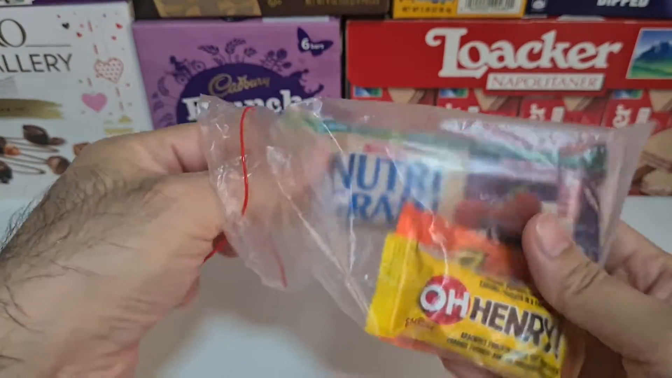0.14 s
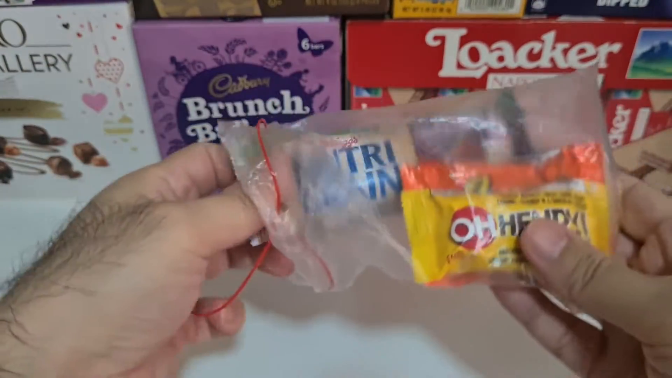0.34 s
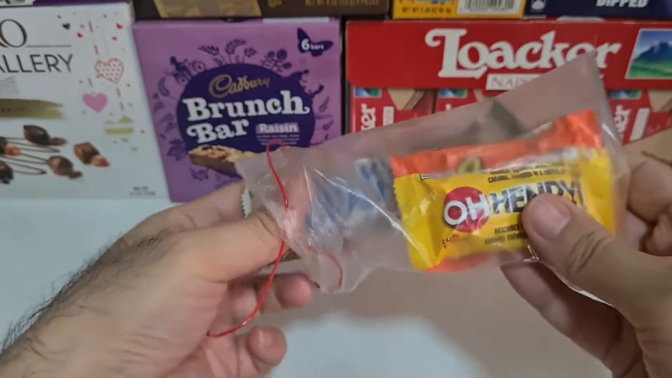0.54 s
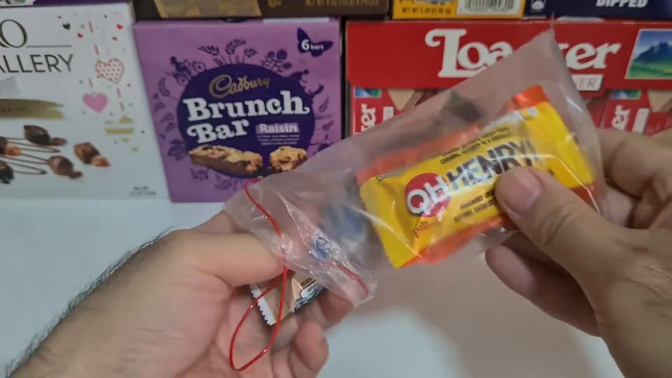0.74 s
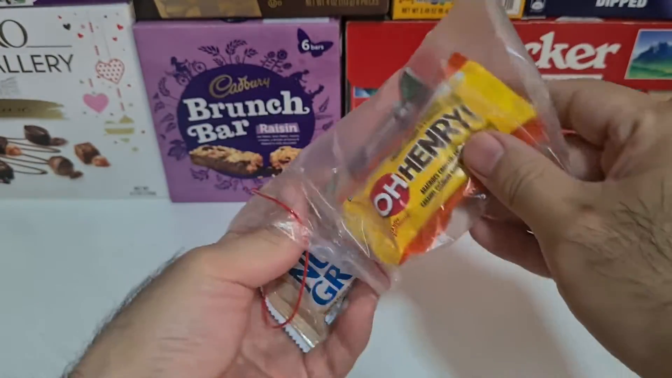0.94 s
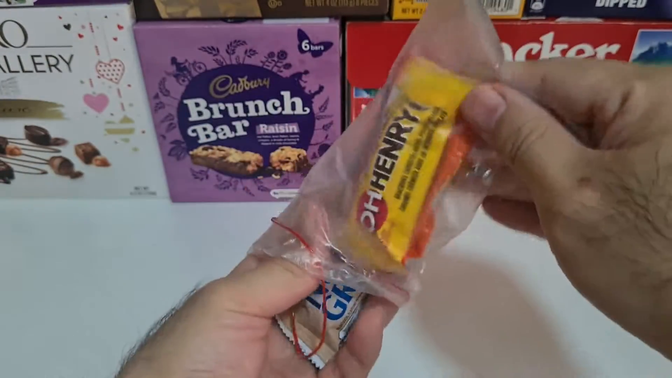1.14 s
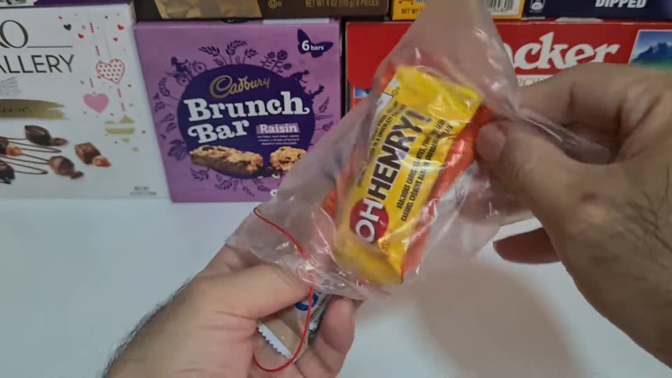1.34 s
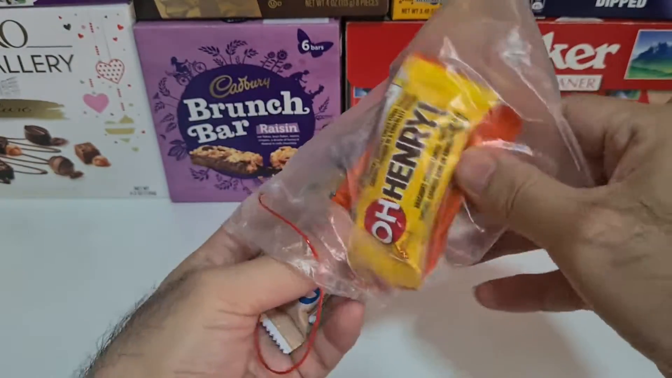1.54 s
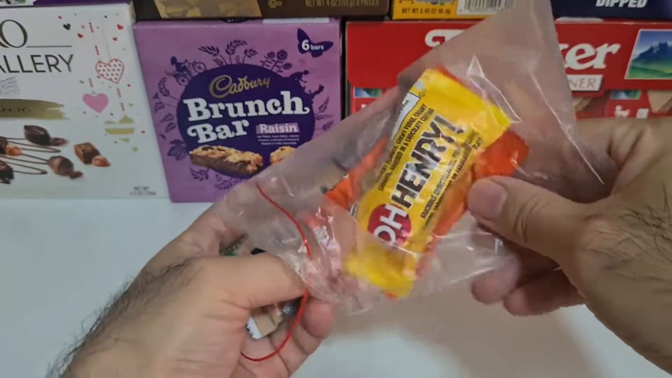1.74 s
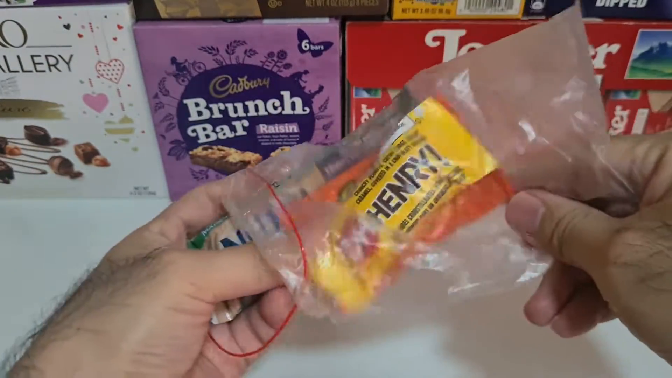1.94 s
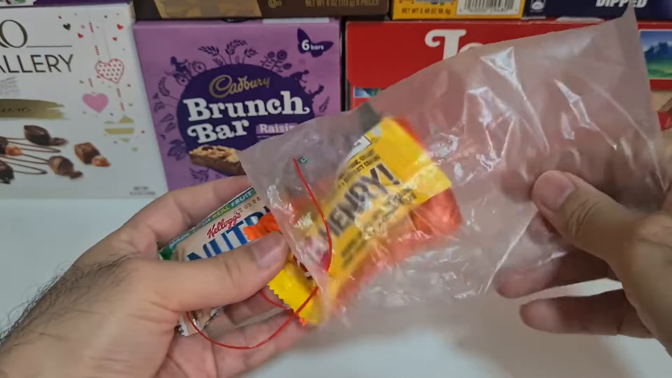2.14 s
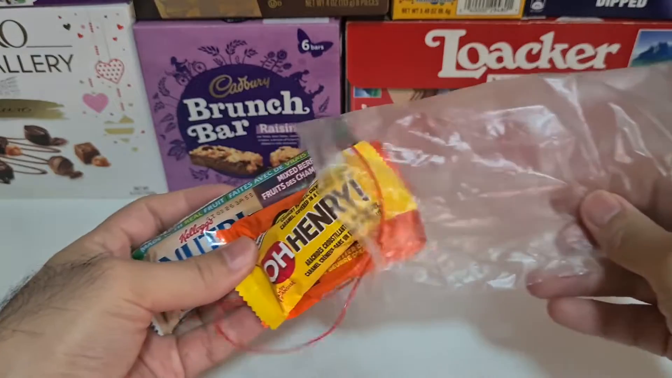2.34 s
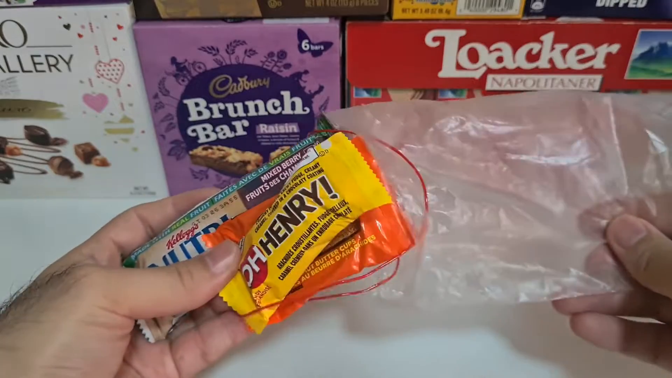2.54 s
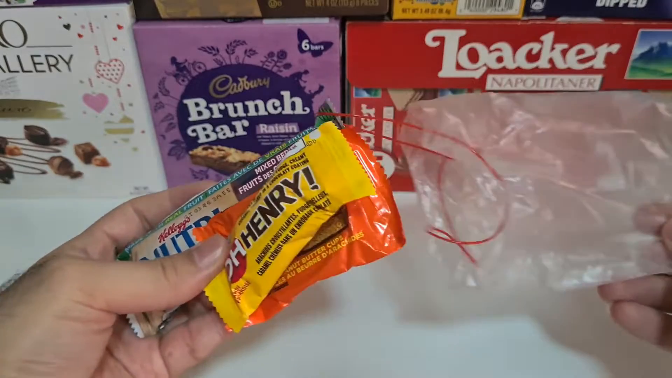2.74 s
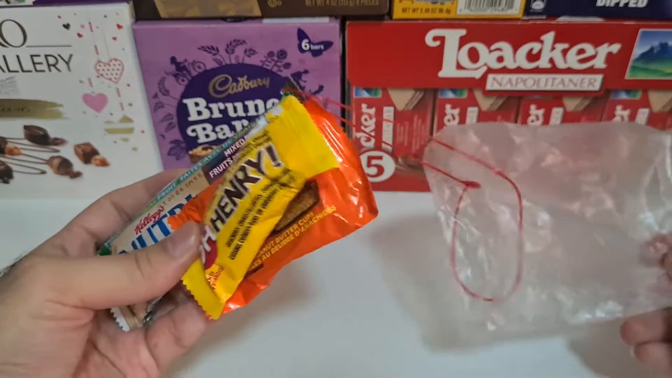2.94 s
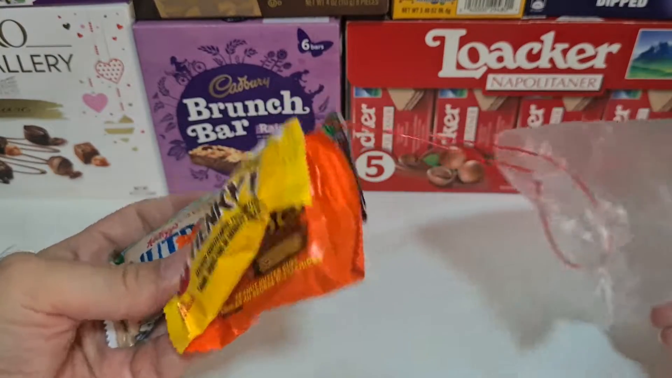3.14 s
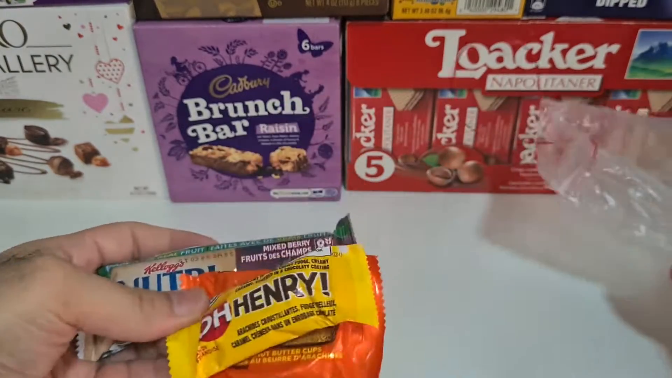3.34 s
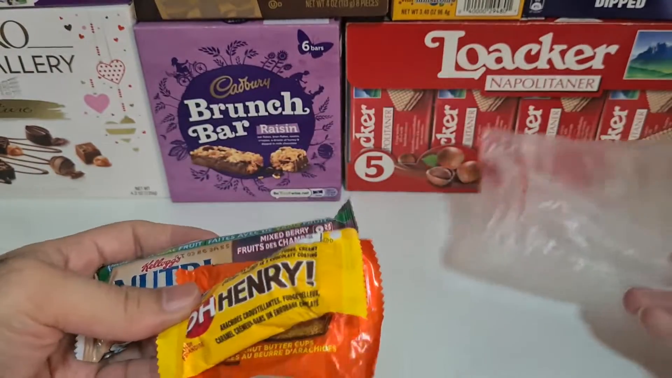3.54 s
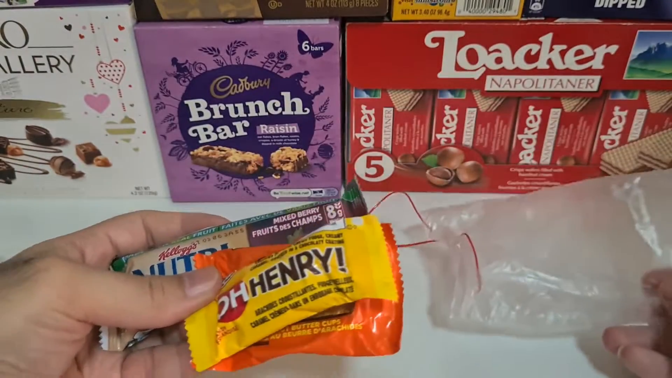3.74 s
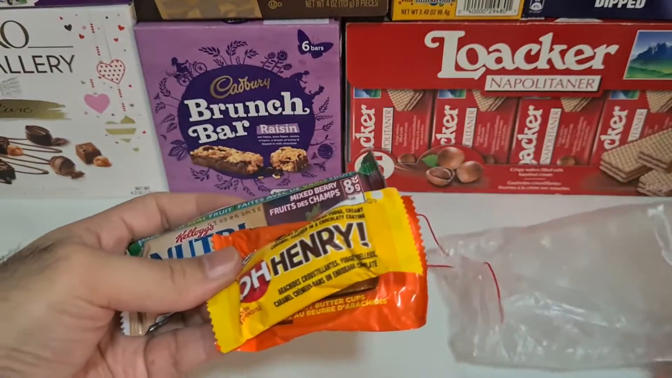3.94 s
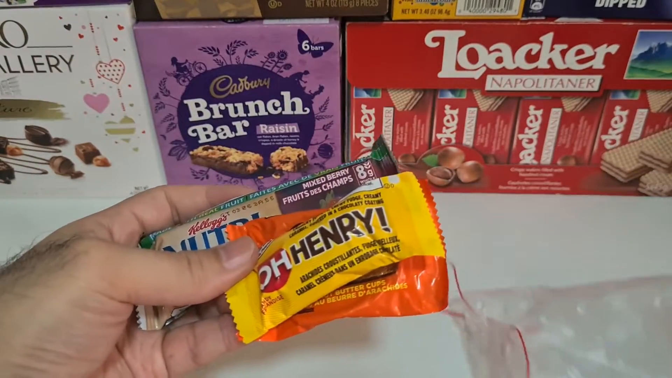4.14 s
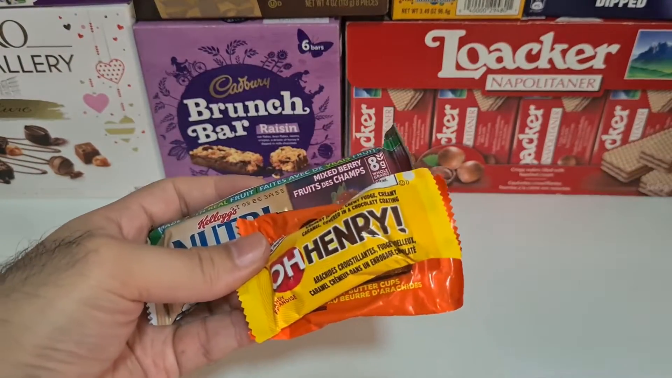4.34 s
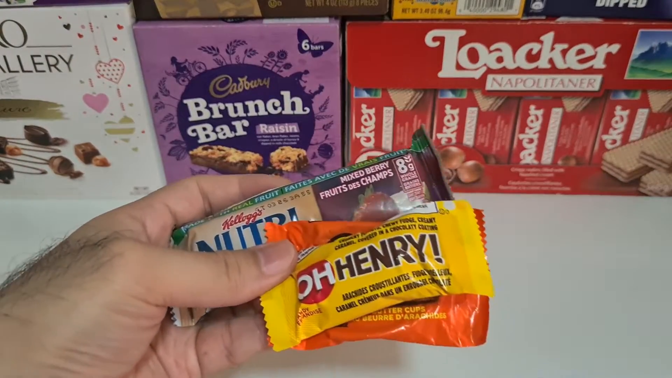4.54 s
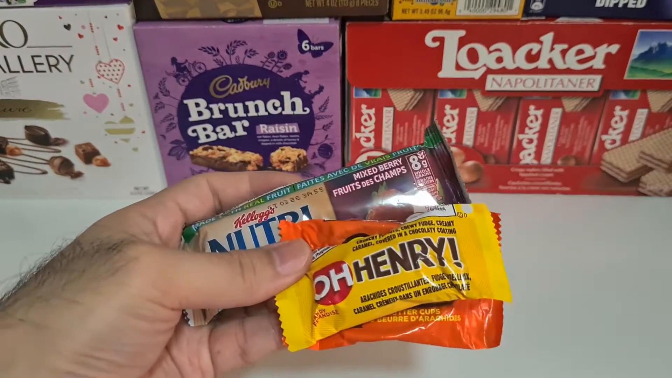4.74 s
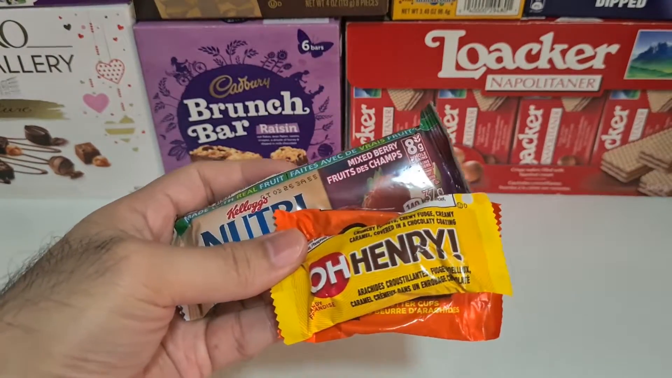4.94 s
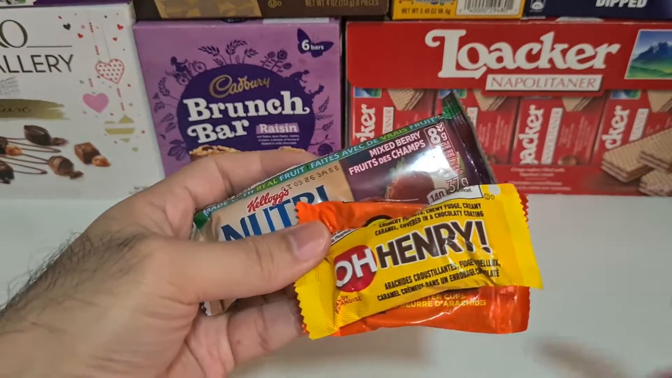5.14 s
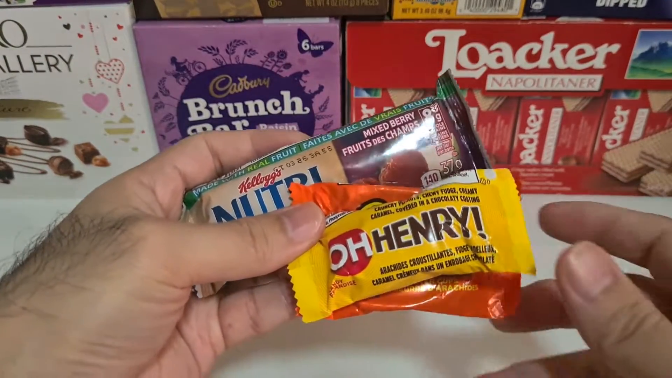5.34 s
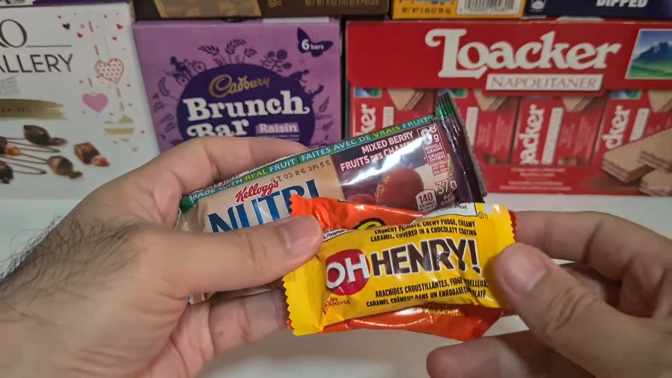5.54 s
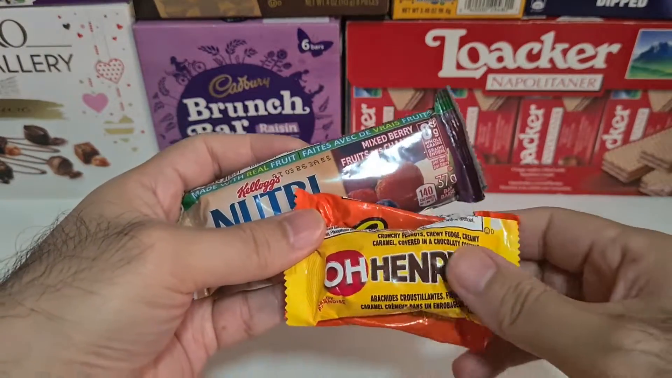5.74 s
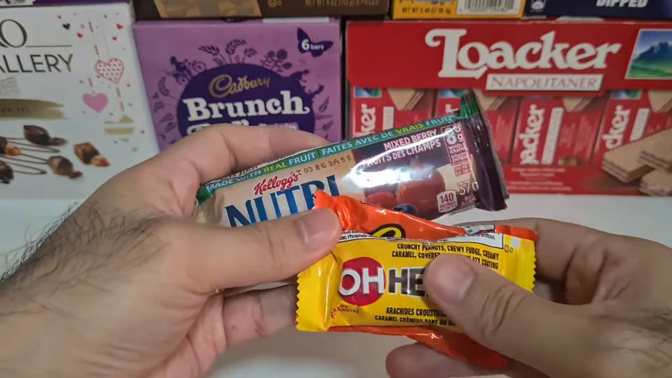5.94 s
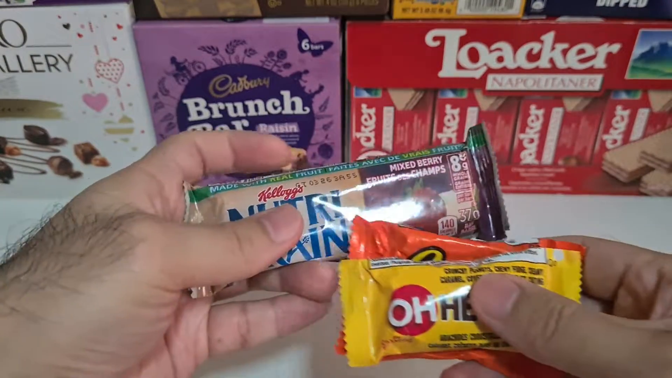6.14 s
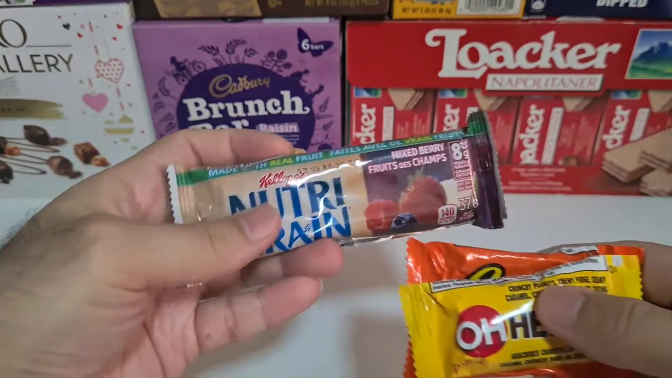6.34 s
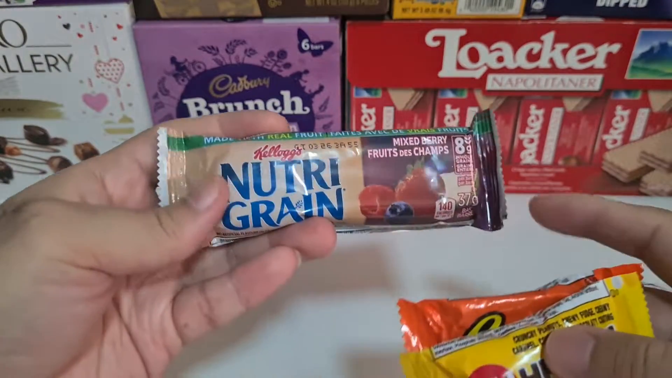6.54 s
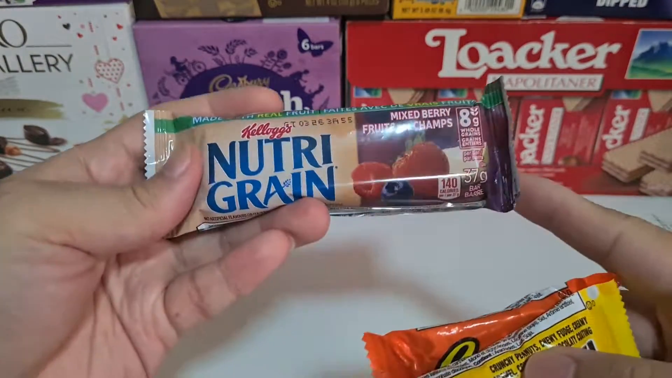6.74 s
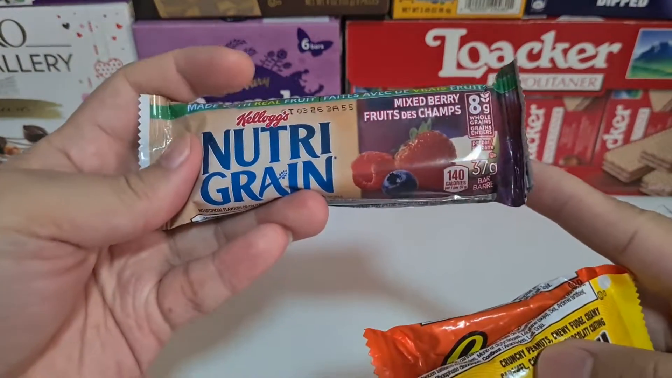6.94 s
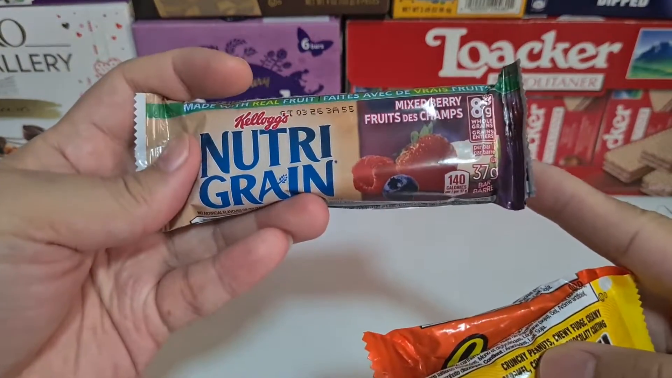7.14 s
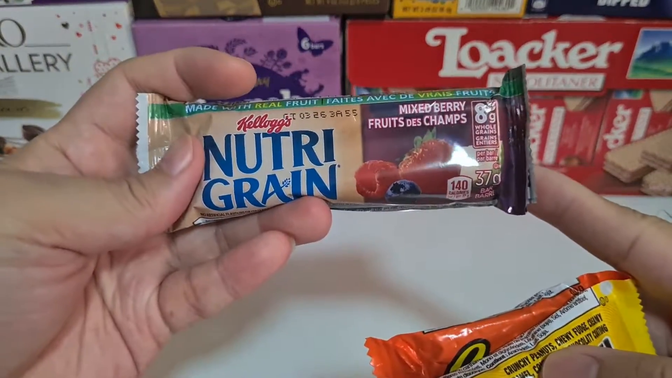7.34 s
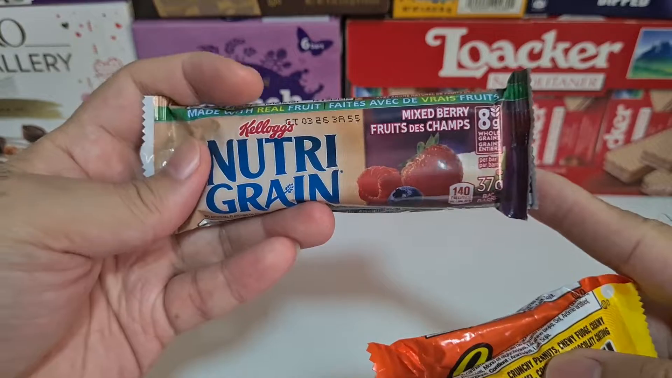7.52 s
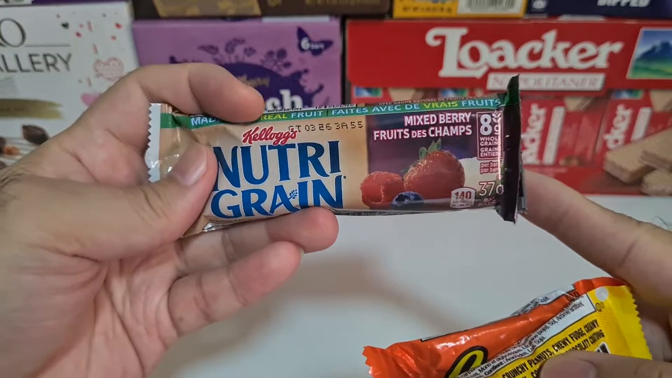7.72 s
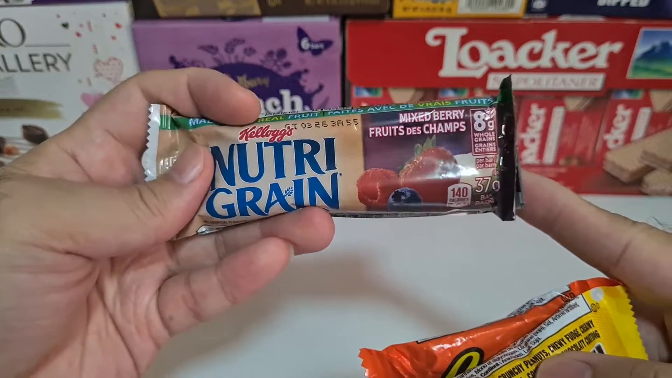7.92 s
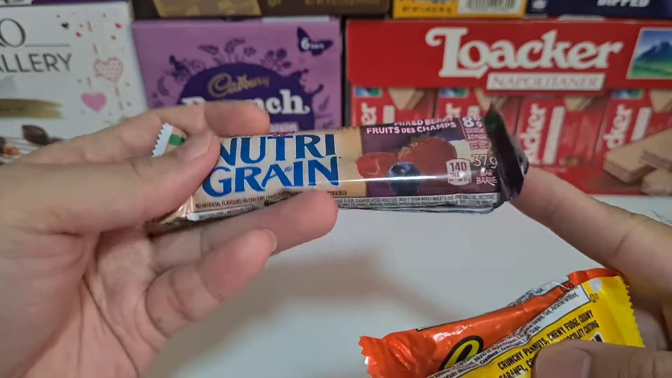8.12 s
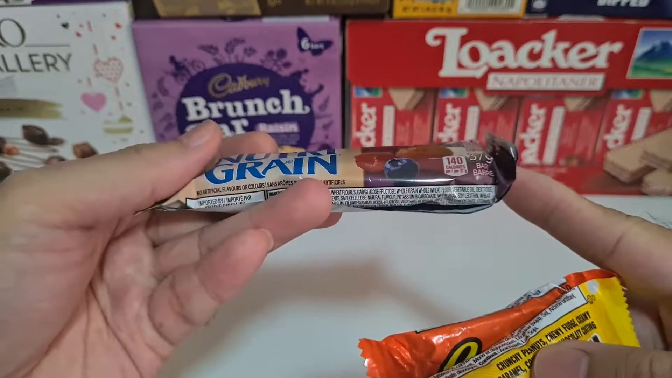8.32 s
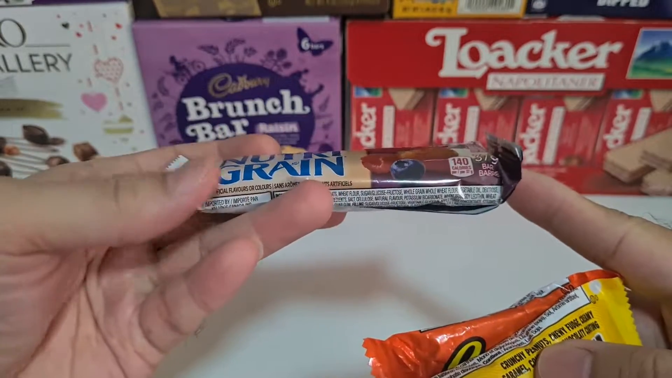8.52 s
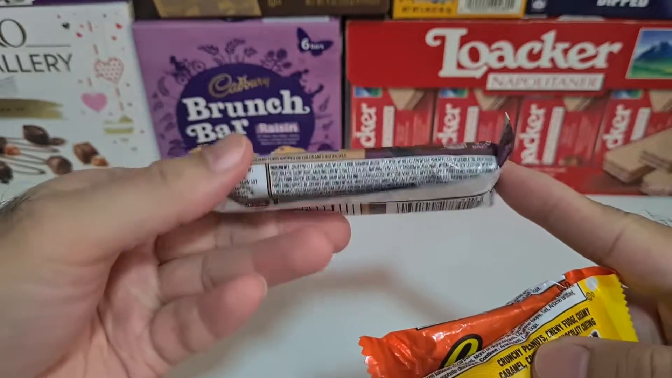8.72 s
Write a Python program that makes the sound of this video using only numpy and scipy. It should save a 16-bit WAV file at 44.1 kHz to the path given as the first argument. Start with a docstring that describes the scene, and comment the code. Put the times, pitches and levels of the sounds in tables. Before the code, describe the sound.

Close to a stereo microphone, hands pull snack bars out of a thin plastic bag, which slides and crinkles densely in small jerks. The bag falls silent and the wrapped bars give faint crackles and soft finger taps. Then the stiff wrappers are squeezed and turned, buckling in clusters of sharp snaps. Ventilation hums low throughout the small room, and a faint deep handling rumble swells near the end.

```python
"""A small ventilated room, with a stereo camera microphone close to a pair of hands.
They pull snack bars out of a thin plastic bag, then turn the wrapped bars over. The bag slides and
crinkles densely; the stiffer wrappers buckle in single sharp snaps with small crackles between.
A deep handling rumble swells near the end. The room answers each snap; its ventilation hums throughout."""
import sys
import numpy as np
from scipy import signal
from scipy.fft import rfft, irfft, next_fast_len
from scipy.io import wavfile
from scipy.ndimage import map_coordinates

SR = 44100
rng = np.random.default_rng(int(sys.argv[2]) if len(sys.argv) > 2 else 0)


def put_to_file(sound):
    """Save the sound as 16-bit audio at rate SR, in the file named by the first command-line argument."""
    columns = np.atleast_2d(sound).T  # one column per channel
    safe = np.clip(columns, -1, 1)
    whole_steps = np.round(safe * 32767)
    wavfile.write(sys.argv[1], SR, whole_steps.astype(np.int16))


N = 387198
TIME = np.arange(N) / SR
LOW_HZ, HIGH_HZ, TOP_HZ = 2000, 7500, 15900  # edges of the plastic's low, middle and top bands


# Levels in the tables are relative, within each source; pan is left minus right.
# The steady pull that draws the bag off: (time [s], crinkle [dB])
PULL = [(0, -40), (0.5, -41), (1.0, -39.5), (1.18, -44.5), (1.4, -38.5), (1.56, -43.5), (1.64, -35),
        (1.8, -37.5), (2.0, -41), (2.25, -44), (2.5, -45), (2.8, -44), (2.91, -55.5), (3.06, -47.5),
        (3.28, -52), (3.45, -52), (3.51, -63), (3.6, -61)]
# Tugs on the bag: (start [s], hold [s], crinkle [dB], flexing [dB])
TUGS = [(0.065, 0.021, -42, -51), (0.195, 0.019, -41, -62), (0.385, 0.042, -38, -60),
        (0.585, 0.034, -38.5, -59), (0.69, 0.045, -48, -62), (1.095, 0.027, -37, -57),
        (1.185, .02, -38.5, -60), (1.275, 0.034, -40, -56), (1.585, .06, -41, -53),
        (1.83, 0.071, -35.5, -46.5), (1.91, 0.057, -38.5, -46.5), (2.025, 0.043, -37.5, -55),
        (2.17, 0.02, -36.5, -51), (2.265, 0.04, -40, -51.5), (2.365, .045, -36, -47.5),
        (2.555, 0.068, -41, -48.5), (2.68, 0.042, -40, -45), (2.975, 0.047, -44, -56),
        (3.105, 0.024, -42, -57), (3.355, 0.049, -44.5, -58.5), (3.41, 0.032, -42, -57)]
# Thin film crinkling, heard close: (frequency [Hz], level [dB])
FILM_SPECTRUM = [(290, -55), (500, -9), (586, -7.5), (893, -7), (1300, -3), (1620, -5.5), (1900, -3.5),
                 (2460, -1.5), (3110, 1), (5240, -1), (6610, 1.5), (8090, -8.5), (14700, -5.5),
                 (16000, -14)]
# The whole sheet flexing: (frequency [Hz], level [dB])
SHEET_SPECTRUM = [(70, -22), (150, -0.5), (300, 1.5), (400, -1.5), (720, -0.5), (1000, -7), (2500, -44.5)]
# The bag's treble sits to the right of the microphone: (frequency [Hz], pan [dB])
BAG_PAN = [(300, -0.5), (1500, 0), (3000, -1.5), (6000, -0.5), (8500, -2.5), (14000, -7)]
BAG_OFF_S = PULL[-1][0]

def bag():
    """Close up, soft film crinkles and slides in small jerks; the sheet flexes lower down when tugged."""
    pull_db = curve(PULL)
    crinkle_db, flex_db = strokes(TUGS, rise_s=0.017, t60=0.15, rest_dbs=[pull_db, pull_db - 17.5])
    fizz_db = -42.5 + 0.93 * (crinkle_db + 40)  # the fizz grows with the crinkle
    jerks = amp(1.22 * wobble(45))
    grains = crackle(rate=800, spread_db=5.5, t60=0.011, ring_db=-5, rub_db=-2)
    film = close_up(grains, FILM_SPECTRUM)
    film = filtered(film, lambda hz: sides(along(BAG_PAN, hz)))
    film = brighten(film, crinkle_db - 1, fizz_db)
    flexing = crackle(rate=300, spread_db=3, t60=0.0096, ring_db=-30, rub_db=-4.5)
    sheet = sides(-1.3) * stereo(flexing, lambda hz: along(SHEET_SPECTRUM, hz))
    held = np.clip((BAG_OFF_S - TIME) / 0.041, 0, 1)
    return held * jerks * (film + amp(flex_db - 1.5) * sheet)


# Fingers squeezing the wrappers: (start [s], hold [s], crackle [dB], fizz [dB])
SQUEEZES = [(3.5, .1, -62, -63), (3.6, .14, -65.5, -69), (4.09, .08, -64, -68), (4.168, .12, -60.5, -59),
            (4.656, .14, -53.5, -58), (4.92, 0.031, -52, -57), (5.453, .16, -67, -82),
            (5.609, 0.089, -56, -71), (5.69, .1, -51, -60), (5.989, .13, -44, -52), (6.15, .04, -56, -58),
            (6.19, 0.032, -42.5, -44), (6.364, 0.037, -47, -50), (6.479, 0.14, -54, -57),
            (6.64, 0.063, -53, -52), (6.726, .06, -59.5, -63), (6.812, .09, -57.5, -57),
            (7.62, .14, -57.5, -62), (8.075, 0.16, -53.5, -58.5), (8.265, .035, -53.5, -58),
            (8.457, 0.043, -52, -59), (8.65, 0.12, -43, -45.5)]
# Stiff wrapper film, heard close: (frequency [Hz], level [dB])
WRAPPER_SPECTRUM = [(200, -24), (600, -5.5), (1300, -4.5), (2000, -6.5), (3000, 0), (5000, 1), (6400, 2.5),
                    (7800, -7.5), (12000, -5.5), (16000, -8.5)]

def wrappers():
    """Fingers shift on the stiff wrappers: sparse small crackles over a faint rub."""
    crackle_db, fizz_db = strokes(SQUEEZES, rise_s=0.013, t60=0.12, rest_dbs=[-72, -87])
    grains = crackle(rate=340, spread_db=5.5, t60=0.01, ring_db=-0.5, rub_db=-1)
    return sides(-2.1) * brighten(close_up(grains, WRAPPER_SPECTRUM), crackle_db - 3, fizz_db - 4.5)


# Large creases buckling close to the microphone:
# (time [s], level [dB], low band re middle [dB], top band re middle [dB], ring [Hz], pan [dB])
SNAPS = [(0.0666, -30, -2.5, -1, 1920, -0.5), (0.149, -30.5, -2, -3, 2330, 3.5),
         (0.24, -33, -14, -5, 2120, -1), (0.3377, -32.5, -19, 2, 7360, -2),
         (0.4095, -32, -8, -9, 1890, 0.5), (0.5175, -34, -11, -4, 6450, 0),
         (0.6096, -29, -5, 1.5, 6350, -1), (0.8734, -30.5, -31, -6, 4900, 0),
         (1.127, -32.5, -6, -5, 3270, 5), (1.442, -31, -16, -3, 6750, 0), (1.521, -35.5, 0, -17, 2880, 1),
         (1.8923, -30, -13, -4, 5740, -6), (1.97, -32.5, -12, 3, 3380, -6),
         (2.371, -25.5, -3, -1, 6600, -8), (2.8087, -34.5, -4, 2, 5340, 0), (2.8561, -37, -13, 7, 9600, -4),
         (3.1115, -36, -10, -2, 2230, -4.5), (3.2098, -37.5, -23, 7, 6370, -8),
         (3.2286, -39, -18, -2, 3750, -5), (3.3047, -32, -25, -1, 10790, -3),
         (3.7178, -49.5, -2, 2, 2930, -1), (3.784, -51.5, -11, -7, 2700, -2),
         (3.9034, -56.5, -12, -5, 3060, -4), (3.985, -55, -9, 2, 6700, -6),
         (4.1956, -45.5, -4, 2, 6050, -5.5), (4.263, -52, 3, 3, 3980, -10.5),
         (4.5112, -47.5, -16, 2, 12560, -8), (4.6404, -49.5, -11, 0, 2240, -8),
         (4.663, -44.5, -10, 2, 6590, -10.5), (4.7246, -47, -22, -8, 3400, -15),
         (4.8514, -48.5, -14, -2.5, 3400, -2.5), (4.9185, -44.5, 0, 3, 4780, -7),
         (4.961, -46, -16, -15, 6360, 2), (5.1314, -58.5, -10, -17, 4130, -2),
         (5.4489, -56, -3, -11, 2540, 1), (5.6571, -46, -6, -10, 3530, 1), (5.698, -42.5, 0, -4, 2840, -3),
         (5.7342, -43, -7, -10, 2280, -1), (5.9778, -44, -1, -15, 3860, -3),
         (6.017, -42, -16, -21, 2920, 0.5), (6.0441, -35, -22, -19, 2950, -1),
         (6.0624, -39, -9, -11, 3180, -1), (6.077, -38.5, -4, -6, 6120, 5), (6.1, -34, -10, -5, 7040, -5),
         (6.118, -38.5, -4, -8, 4660, 0), (6.1405, -41.5, 0, -8, 1210, -1), (6.2028, -34, -3, -8, 1950, 2),
         (6.2708, -24.5, -16.5, 2.5, 5770, -4), (6.328, -35, -9.5, -9, 4600, -2),
         (6.3678, -39.5, -7, -3, 3000, 4), (6.4279, -30.5, -29, -4, 3100, -6),
         (6.4679, -31, -8.5, -1, 7200, 0.5), (6.4887, -33.5, -16, -3, 11820, -2),
         (6.531, -37, -34, -6, 6010, 1), (6.6401, -36, -11, -3.5, 3700, 0.5),
         (6.6837, -46, -5, -20, 2015, 0), (6.7313, -36, -12, -7.5, 4640, 0),
         (6.7993, -37.5, -3, -2.5, 3600, 1), (6.823, -33, -9, -8, 3030, 2),
         (6.867, -37.5, -35, -7, 4420, 6), (6.8861, -35.5, -13, -1.5, 2730, -4),
         (7.2761, -53, -14, -13, 2800, -1.5), (7.373, -55.5, -2, -27, 2870, -5),
         (7.4518, -54, -2, -8, 2820, -2), (7.5528, -42.5, -27, -2, 5990, 3),
         (7.5644, -40, -31, -2.5, 4900, -3), (7.6246, -26.5, -22, 2, 6130, -0.5),
         (7.649, -31.5, -33, -4, 6100, -4), (7.669, -27.5, -10.5, -4.5, 2940, -1.5),
         (7.844, -54, -4, 0, 2890, 0.5), (7.9157, -45, -14, -8, 4360, -2),
         (7.9414, -43.5, -11, 0, 12400, -1), (8.0463, -42, -13, -4, 6040, -2),
         (8.0934, -39, -8.5, -4.5, 6400, 10), (8.1247, -32, -13.5, -12.5, 2780, -3),
         (8.1459, -36.5, -22, -6, 5510, -1), (8.192, -37.5, -16, -12.5, 5040, 1),
         (8.213, -46, -1, -6.5, 2034, 2), (8.2792, -43.5, -10, -10, 2760, 5.5),
         (8.447, -45, -13, -14, 3200, 3), (8.5008, -38.5, -16, -11, 5700, 1),
         (8.6433, -38.5, -16, -11.5, 6300, 3.5), (8.69, -32.5, -16, 1, 3880, 6),
         (8.7466, -33, -6.5, -7.5, 1900, 6)]

def snaps():
    """The larger creases buckle one by one, each with its own size, brightness and direction."""
    out = np.zeros((2, N))
    lead, window = SR // 500, SR // 250
    for s, db, low_db, top_db, ring_hz, pan_db in SNAPS + settling(2) + flurries() + ticks(12):
        flip = buckle([ring_hz], t60=0.0085, ring_db=-6, ring_t60=0.009, size=900)[:, 0]
        flip += amp(-14) * pouch(hollow_hz=1950, t60=0.018, size=900)
        flip = close_up(np.pad(flip, ((0, 0), (lead, 0))), WRAPPER_SPECTRUM)
        low = filtered(flip, lambda hz: 1 - above(hz, LOW_HZ, order=6))
        top = filtered(flip, lambda hz: above(hz, HIGH_HZ))
        snap = unit(flip - low - top) + amp(low_db - 1) * unit(low) + amp(top_db + 2) * unit(top)
        snap *= np.sqrt(window) / np.linalg.norm(snap, axis=1, keepdims=True)  # energy of 4 ms at rms 1
        add(out, s - lead / SR, amp(db + 1.6) * sides(pan_db) * snap)
    return out


def settling(count):
    """Snap rows: after each large crease, its neighbours give way in quick, fading succession."""
    rows = []
    for s, db, low_db, top_db, ring_hz, pan_db in SNAPS:
        first_db = -46 + 0.73 * (db + 34.5)  # louder snaps set off louder neighbours
        for k, (gap, size, pitch) in enumerate(rng.standard_normal((count, 3))):
            s += 0.0065 * np.exp(0.3 * gap)
            hz = min(ring_hz * np.exp(0.2 * pitch), TOP_HZ)
            rows.append((s, first_db - 5 * k + 1.4 * size, low_db, top_db, hz, pan_db))
    return rows


def flurries():
    """Snap rows: pulling and squeezing flip middling creases, louder the harder the hands work."""
    rows = flips(0, BAG_OFF_S, rate=13, level_at=lambda s: curve(PULL, s) + 1, top_db=-3.5)
    for s, hold_s, crackle_db, fizz_db in SQUEEZES:
        rows += flips(s, hold_s, rate=30, level_at=lambda _: crackle_db + 4, top_db=fizz_db - crackle_db)
    return rows


def flips(start_s, length_s, rate, level_at, top_db):
    """Snap rows: about rate creases a second flip at uneven intervals, near level_at(time) in dB."""
    count = int(np.ceil(length_s * rate))
    times = start_s + length_s * (np.arange(count) + rng.random(count)) / count
    return [(s, level_at(s) + 1.7 * size, -8 + 3 * low, top_db + 3 * top,
             3100 * np.exp(0.3 * pitch), 4 * side - 1.5)
            for s, (size, low, top, pitch, side) in zip(times, rng.standard_normal((count, 5)))]


def ticks(count):
    """Snap rows: once the bag is off, faint creases relax at chance moments."""
    db, low_db, top_db = -61, -8, -10
    times = rng.uniform(BAG_OFF_S, N / SR, count)
    return [(s, db, low_db, top_db, 3100 * np.exp(0.25 * pitch), 3 * side - 2)
            for s, (pitch, side) in zip(times, rng.standard_normal((count, 2)))]


def buckle(ring_hz, t60, ring_db, ring_t60, size):
    """Creases flip, one for each pitch: a burst from the film and a brief ring of the freed facet."""
    t = np.arange(size) / SR
    burst = rng.standard_normal((2, len(ring_hz), size)) * amp(-60 * t / t60)
    phase = rng.random((2, len(ring_hz), 1))
    ring = np.sin(2 * np.pi * (np.outer(ring_hz, t) + phase)) * amp(ring_db - 60 * t / ring_t60)
    return (burst + ring) * (1 - np.exp(-t / 0.0003))


def crackle(rate, spread_db, t60, ring_db, rub_db, size=220):
    """Tiny creases of random size and pitch, rate a second, over the rub of film on film."""
    starts = np.flatnonzero(rng.random(N) < rate / SR)
    loud, pitch = rng.standard_normal((2, N))[:, starts]
    ring_hz = np.minimum(3800 * np.exp(0.6 * pitch), TOP_HZ)
    creases = buckle(ring_hz, t60, ring_db, t60, size) * amp(spread_db * np.minimum(loud, 2))[:, None]
    samples = (starts[:, None] + np.arange(size)).ravel()
    grains = np.array([np.bincount(samples, channel.ravel(), N)[:N] for channel in creases])
    return unit(grains) + amp(rub_db) * rng.standard_normal((2, N))


def pouch(hollow_hz, t60, size):
    """The sealed, air-filled wrapper gives a hollow note, its pitch different with each grip."""
    t = np.arange(size) / SR
    hz = hollow_hz * np.exp(0.22 * rng.standard_normal())
    return np.sin(2 * np.pi * hz * t) * amp(-60 * t / t60) * [[1], [0.5]]


def strokes(rows, rise_s, t60, rest_dbs):
    """Two level curves in dB: each hand stroke rises, holds and dies away over the resting levels."""
    t = np.arange(SR) / SR
    power = np.zeros((2, N)) + amp(rest_dbs).reshape(2, -1) ** 2
    for s, hold_s, *dbs in rows:
        shape = np.minimum(t / rise_s, 1) * amp(-60 * np.maximum(t - hold_s, 0) / t60)
        add(power, s, np.outer(amp(dbs), shape) ** 2)
    return 10 * np.log10(power)


# Film sliding over a wrapper, close by: (middle time [s], level [dB], half length [s])
SLIDES = [(1.613, -36, 0.024), (2.384, -34.5, 0.028), (4.223, -63.5, .07), (4.4, -64.5, 0.25),
          (4.547, -55.5, 0.022), (4.735, -58, 0.1), (5.885, -62.5, 0.15)]

def slides():
    """A smooth hiss swells and fades as one film slips along another."""
    swell = sum(amp(db) * np.exp(-((TIME - s) / half_s) ** 4) for s, db, half_s in SLIDES)
    return swell * sides(-1.5) * close_up(rng.standard_normal((2, N)), FILM_SPECTRUM)


# Fingertips pressing on the bars: (time [s], level [dB], t60 [s])
TAPS = [(3.245, -53.5, 0.15), (4.2, -53, 0.11), (4.755, -53.5, .2), (4.83, -60, .15), (4.92, -54.5, 0.13),
        (5.39, -56, .1), (5.68, -59, 0.18), (5.98, -50, .12), (6.085, -58, 0.086), (6.2, -58, .06),
        (6.375, -50, .08), (6.468, -57, 0.06), (6.82, -50, 0.075), (8.7, -53, .12)]

def taps():
    """The soft filling takes a fingertip with a short dull knock."""
    press, t = np.zeros((1, N)), np.arange(SR // 4) / SR
    for s, db, t60 in TAPS:
        knock = amp(db - 60 * t / t60) * (1 - np.exp(-t / 0.0017))
        add(press, s, knock[None])
    return press * noise(lambda hz: along(SHEET_SPECTRUM, hz))


# Soft bumps of the hands near the microphone: (time [s], level [dB], pitch [Hz], t60 [s])
BUMPS = [(1.875, -39, 58, 0.25), (5.455, -31.5, 57.8, 0.3)]

def bumps():
    """Dull low thuds as the hands move."""
    out, t = np.zeros((2, N)), np.arange(SR // 2) / SR
    for s, db, hz, t60 in BUMPS:
        envelope = amp(db - 60 * t / t60) * (1 - np.exp(-t / 0.0097))
        add(out, s, sides(-2) * envelope * np.sin(2 * np.pi * hz * t))
    return out


# Handling rumble at the microphone: (time [s], level [dB])
HANDLING_LEVEL = [(0, -80), (6.6, -80), (7.1, -60), (7.8, -57), (8.5, -65), (8.78, -73)]
# Its narrow, deep band: (frequency [Hz], level [dB])
HANDLING_SPECTRUM = [(26, -41), (33, -10), (37, 0), (44, -28), (100, -76)]

def handling():
    """A deep handling rumble from the hands, swelling and fading near the end."""
    return sides(-2.9) * amp(curve(HANDLING_LEVEL)) * noise(lambda hz: along(HANDLING_SPECTRUM, hz))


# Resonances of the space between hands, table and boxes: (centre [Hz], width [Hz], lift [dB])
NOOK = [(590, 150, 5), (1334, 200, 5), (1904, 190, 7.5), (2840, 480, 3), (3940, 150, 1)]

def nook(hz):
    """Lift in dB from the surfaces near the microphone."""
    return sum(db / (1 + (2 * (hz - centre) / width) ** 2) for centre, width, db in NOOK)


# Decay of the small room: (frequency [Hz], t60 [s])
ROOM_T60 = [(200, 0.45), (2000, 0.26), (6000, 0.29), (14000, 0.19)]

def room(x):
    """Table and boxes scatter the sound at once; the walls answer longer, treble dying first."""
    hz, t, spectra = signal.stft(rng.standard_normal((2, SR // 2)), SR, nperseg=256)
    decay = amp(-60 * t / along(ROOM_T60, hz)[:, None])
    walls = signal.istft(spectra * decay, SR, nperseg=256)[1]
    t = np.arange(walls.shape[1]) / SR
    near = rng.standard_normal(walls.shape) * amp(-60 * t / 0.023) * (t > 0.001)
    answer = stereo(unit(walls) + unit(near), np.zeros_like)
    return signal.fftconvolve(x, answer / np.linalg.norm(answer[0]), axes=1)[:, :N]


# Duct rumble in the background: (time [s], level [dB])
DUCT_LEVEL = [(0, -51), (1, -55), (1.9, -52.5), (4.1, -55.5), (5.3, -54), (6.3, -53.5), (7.1, -59),
              (8.78, -55)]
# The duct's colour: (frequency [Hz], level [dB])
DUCT_SPECTRUM = [(20, -46), (35, -13), (52, 0.5), (75, 4), (92, -1.5), (115, -8.5), (160, -19.5),
                 (300, -44.5), (1000, -90)]
# Moving air in the room: (frequency [Hz], level [dB])
AIR_SPECTRUM = [(71, -49), (120, -13), (181, -5.5), (272, -11.5), (314, -5), (822, -7), (1240, -13),
                (2110, -15), (2380, -19.5), (2870, -19), (3520, -21), (5750, -29), (8140, -34),
                (16000, -37.5)]
# Hum of the fan: (frequency [Hz], level [dB])
FAN_TONES = [(75.4, -73), (91, -62.5), (183, -77.5), (587, -80.5), (2169, -79.5)]

def ventilation():
    """Room tone: a low duct rumble, a soft rush of air and a few unsteady fan tones."""
    duct = amp(curve(DUCT_LEVEL)) * noise(lambda hz: along(DUCT_SPECTRUM, hz))
    air = amp(-60) * noise(lambda hz: along(AIR_SPECTRUM, hz) + 0.51 * nook(hz))
    fan = sum(amp(db) * unit(np.sin(2 * np.pi * hz * TIME + 0.9 * wobble(6))) for hz, db in FAN_TONES)
    return sides(-2.9) * (duct + fan) + sides(-1.3) * air


# Likeness of the microphone's two channels: (frequency [Hz], correlation [0-1])
LIKENESS = [(60, 0.99), (350, 0.8), (700, 0.51), (1500, 0.4), (3000, 0.26), (5000, 0.02), (16000, 0.077)]

def stereo(pair, colour):
    """Two unrelated signals become left and right, alike in the bass, coloured by dB(Hz), rms 1."""
    def response(hz):
        angle = np.arccos(along(LIKENESS, hz)) / 2
        return amp(colour(hz)) * [np.cos(angle), np.sin(angle)]
    mid, side = filtered(pair, response)
    return unit(np.array([mid + side, mid - side]))


def close_up(pair, spectrum):
    """Plastic at the microphone, coloured by its own spectrum and the nearby surfaces."""
    return stereo(pair, lambda hz: along(spectrum, hz) + nook(hz))


def noise(colour):
    """Stereo noise coloured by dB(Hz), rms 1."""
    return stereo(rng.standard_normal((2, N)), colour)


def brighten(x, body_db, fizz_db):
    """Set the body and the fizzy top of a rustle to their levels."""
    fizz = filtered(x, lambda hz: above(hz, HIGH_HZ))
    body = x - fizz
    middle = filtered(body, lambda hz: above(hz, LOW_HZ))
    return amp(body_db) * body / np.std(middle) + amp(fizz_db) * unit(fizz)


def amp(db):
    """Decibels to gain."""
    return 10 ** (np.asarray(db) / 20)


def unit(x):
    """Scale to rms 1."""
    return x / np.sqrt(np.mean(x ** 2) + 1e-20)


def along(points, hz):
    """(Hz, value) points read on a log axis."""
    knots_hz, values = np.transpose(points)
    return np.interp(np.log(hz + 1), np.log(knots_hz + 1), values)


def curve(points, s=TIME):
    """(time, value) points read at s, by default at every sample."""
    return np.interp(s, *np.transpose(points))


def wobble(rate):
    """A smooth random curve, rate knots a second."""
    return map_coordinates(rng.standard_normal(int(N * rate / SR) + 4), [TIME * rate])


def filtered(x, response):
    """Filter x by a gain that is a function of Hz."""
    size = x.shape[-1]
    padded = next_fast_len(size + min(size, 8192))
    return irfft(rfft(x, padded) * response(np.fft.rfftfreq(padded, 1 / SR)), padded)[..., :size]


def above(hz, edge_hz, order=12):
    """High-pass gain; one minus it is the low-pass."""
    return 1 - 1 / (1 + (hz / edge_hz) ** order)


def sides(db):
    """Left and right gains for a level difference."""
    pair = amp(np.array([db, -db]) / 2).reshape(2, -1)
    return pair / np.sqrt(np.mean(pair ** 2, axis=0))


def add(track, s, sound):
    """Mix a sound into the track at a time."""
    start = int(np.clip(round(s * SR), 0, N - 1))
    track[:, start:start + sound.shape[1]] += sound[:, :N - start]


def scene():
    """Plastic close to the microphone, the humming room behind it."""
    plastic = bag() + slides() + wrappers() + snaps() + taps()
    return plastic + amp(-8) * room(plastic) + bumps() + ventilation() + handling()


def record(dry):
    """The camera keeps nothing above its band limit."""
    return filtered(dry, lambda hz: hz < TOP_HZ)


dry = scene()
out = record(dry)
put_to_file(out)
```